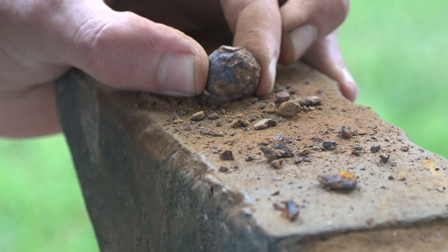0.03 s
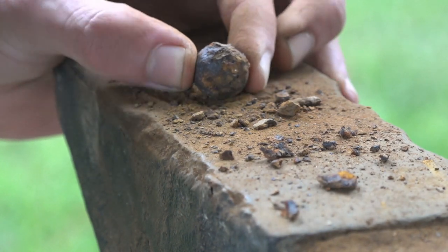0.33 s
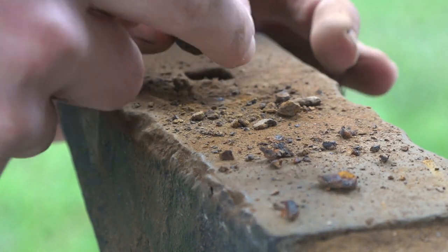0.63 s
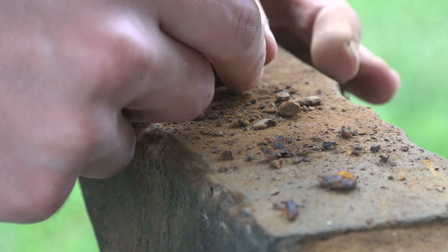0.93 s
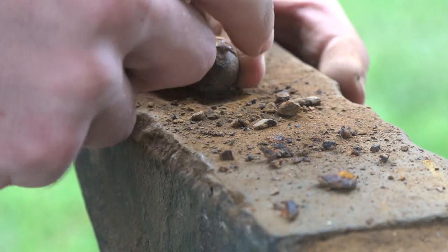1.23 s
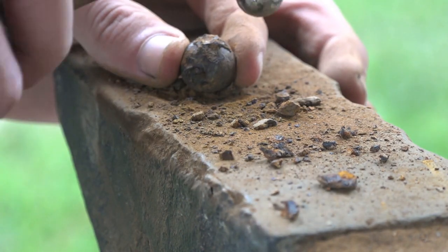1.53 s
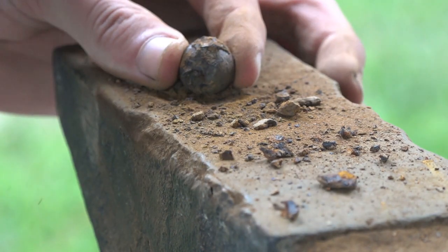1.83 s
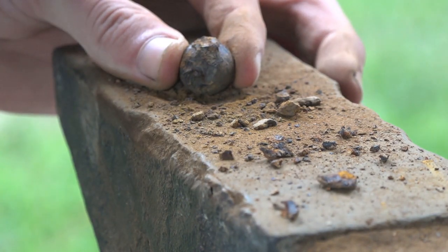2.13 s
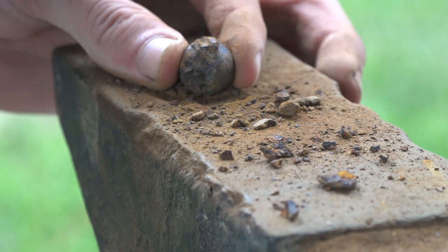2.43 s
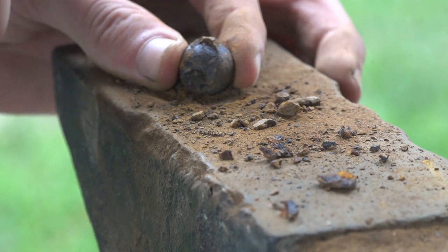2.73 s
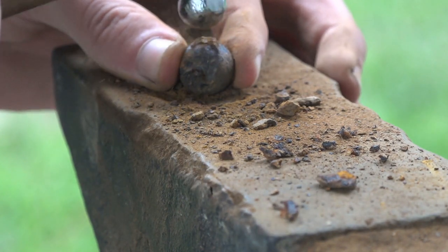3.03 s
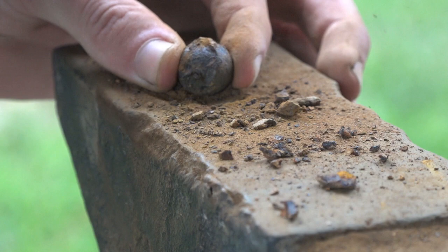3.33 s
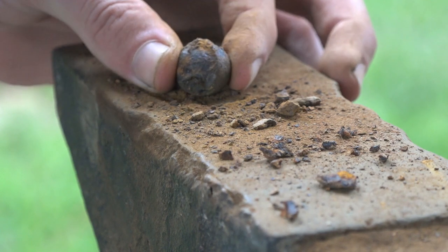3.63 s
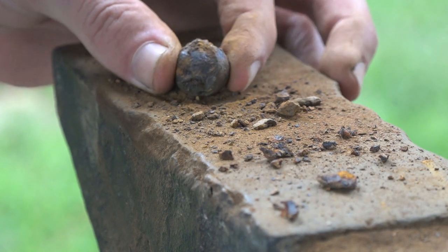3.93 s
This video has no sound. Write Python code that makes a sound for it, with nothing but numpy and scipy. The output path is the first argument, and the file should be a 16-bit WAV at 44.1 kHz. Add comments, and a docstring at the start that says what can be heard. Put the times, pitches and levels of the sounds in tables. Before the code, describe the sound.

A small hammer taps an iron ball on a heavy metal block, close by, at the very start and at 0.3 seconds. After a pause, nine more taps run from 1.8 to 3.9 seconds, about four a second, the last slightly softer. Each is a sharp crack with a dull knock, short clang, brief echo and thin lingering ring. Distant insects hiss faintly over a low rumble of outdoor air.

```python
"""A small hammer taps a rusty iron ball on a heavy iron block, outdoors, close to a stereo microphone:
two taps, a pause to turn the ball, then nine more. Each tap is a sharp crack, a knock of the block's
stand, a short clang and a long thin ring of the block. Nearby surfaces throw back a brief dense echo;
farther off, insects hiss over a faint rumble of air."""
import sys
import numpy as np
from scipy import signal
from scipy.fft import rfft, irfft, next_fast_len
from scipy.io import wavfile
from scipy.ndimage import map_coordinates

SR = 44100
rng = np.random.default_rng(int(sys.argv[2]) if len(sys.argv) > 2 else 0)


def output_pcm(signal):
    """Save a mono or channel-first signal as 16-bit PCM at the path in sys.argv[1].

    Samples are clipped to [-1, 1] before scaling.
    """
    pcm = np.clip(np.atleast_2d(signal).T, -1, 1) * 32767
    wavfile.write(sys.argv[1], SR, np.round(pcm).astype(np.int16))


N = 176400
TAP_SAMPLES = SR // 2  # room for one crack or echo


def amp(db):
    return 10 ** (np.asarray(db) / 20)


def along(points, hz):
    """(f/Hz, value) points read on a log axis."""
    f, v = np.transpose(points)
    return np.interp(np.log(hz + 1), np.log(f + 1), v)


def curve(rows):
    """(t/s, value) rows as one value per sample."""
    return np.interp(np.arange(N) / SR, *np.transpose(rows))


def wobble(knots_per_s):
    """A smooth random curve."""
    knots = rng.standard_normal(int(N * knots_per_s / SR) + 4)
    return map_coordinates(knots, [np.arange(N) * knots_per_s / SR])


def filtered(x, gain):
    """x times a gain that depends on frequency."""
    n = x.shape[-1]
    padded = next_fast_len(n + SR // 10)
    return irfft(rfft(x, padded) * gain(np.fft.rfftfreq(padded, 1 / SR)), padded)[..., :n]


def noise(spectrum, alike, size):
    """Stereo noise of rms 1 with a given spectrum and left-right likeness."""
    hz = np.fft.rfftfreq(size, 1 / SR)
    width = np.arccos(np.clip(along(alike, hz), -1, 1)) / 2
    bins = np.exp(2j * np.pi * rng.random((2, len(hz)))) * amp(along(spectrum, hz))
    mid, side = irfft(bins * [np.cos(width), np.sin(width)], size)
    return unit(np.array([mid + side, mid - side]))


def unit(x):
    return x / np.sqrt(np.mean(x ** 2) + 1e-20)


def fade(t, t60):
    """Exponential decay by 60 dB in t60."""
    return np.exp(-np.log(1000) * np.maximum(t, 0) / t60)


def add(out, x, start_s):
    """Mix x into out from start_s on."""
    i = round(start_s * SR)
    out[:, i:i + x.shape[1]] += x[:, :out.shape[1] - i]


# typical phase offset of a mode, opposite on the microphone's two sides: f/Hz, offset/rad
PHASE_SPREAD = [(200, 0.2), (500, 0.16), (1200, 0.027), (4500, 0.0075), (6000, 0.45), (9000, 0.81),
                (11000, .03)]
def ring(modes, levels_db, at_hz, build_s, scatter_db=2.24):
    """Struck modes, weighted by levels_db at at_hz, swell and die, out of step left and right."""
    t = np.arange(SR) / SR
    colour = list(zip(at_hz, levels_db))
    out = np.zeros((2, SR))
    for hz, db, t60 in modes:
        level, phase, spread = rng.standard_normal(3)
        offset = along(PHASE_SPREAD, hz) * spread * np.array([[1], [-1]])
        gain = amp(db + along(colour, hz) + scatter_db * level)
        out += gain * fade(t, t60) * np.sin(2 * np.pi * hz * t + np.pi * phase + offset)
    return out * (1 - np.exp(-t / build_s))


# spectrum of the open air: f/Hz, relative level/dB
AIR_SPECTRUM = [(25, -7), (65, 2.5), (120, 1), (230, 1), (320, -11.5), (450, -7), (650, -13), (1050, -9.5),
                (2500, -16.5), (5000, -17.5), (10000, -31), (13000, -24), (15500, -22.5)]
# the rumble dips after the taps and returns as the recorder's gain recovers: t/s, level/dB
AIR_LEVEL = [(0, -63), (.8, -65.5), (1.3, -63.5), (1.8, -61.5), (2.2, -60.5), (4, -64)]
# background at the microphone: f/Hz, left-right likeness
BACKGROUND_ALIKE = [(50, 0.13), (130, 0.98), (1000, 0.74), (4000, 1), (7000, 0.39), (13000, 0.94)]
def air(gust_db=1):
    """Air rumbles faintly around the microphone, wavering in small gusts."""
    level_db = curve(AIR_LEVEL) + gust_db * wobble(knots_per_s=5.98)
    return noise(AIR_SPECTRUM, BACKGROUND_ALIKE, N) * amp(level_db)


# spectrum of the chorus: f/Hz, relative level/dB
INSECT_SPECTRUM = [(3500, -49), (4300, -12), (4700, 0.5), (5300, -13.5), (6300, -3), (6850, 3.5),
                   (7500, 2.5), (8150, -2.5), (8600, -10), (11000, -18)]
# the hiss comes up in the pause as the recorder's gain recovers: t/s, level/dB
INSECT_LEVEL = [(0, -61.5), (.7, -61.5), (1.3, -59), (1.8, -59), (2.2, -60), (4, -63)]
def insects():
    """A far chorus of insects blends into one high hiss."""
    return noise(INSECT_SPECTRUM, BACKGROUND_ALIKE, N) * amp(curve(INSECT_LEVEL))


# long modes of the iron block: f/Hz, level/dB, t60/s
BLOCK_MODES = [(1372, -51, .75), (3774, -46, .85), (3910, -30, .42), (4408, -58, .8), (5236, -50, .75),
               (5318, -47, .44), (5705, -58, .8), (5865, -59, .8), (5938, -50, .75), (6844, -59, .7),
               (8467, -55, .65), (9218, -46, .42), (9269, -46, .6), (9278, -52, .5), (9980, -53, .5),
               (11996, -62, .65), (14575, -62, .55)]
def block_ring(levels_db=(0, 0, 0)):
    """The heavy block takes up the blow and rings on, thin and long."""
    return ring(BLOCK_MODES, levels_db, at_hz=(1400, 4140, 9000), build_s=0.033)


def lingering_ring(age_s=0.12, db=-4):
    """The block still rings from a tap age_s before the start."""
    out = np.zeros((2, N))
    add(out, amp(db) * block_ring()[:, round(age_s * SR):], 0)
    return out


# spectrum of the contact, close up: f/Hz, relative level/dB
CRACK_SPECTRUM = [(100, -62), (400, 0), (1150, 2), (1900, -9), (3200, 5), (5000, -14.5), (8500, 7),
                  (10500, -1), (15500, -3)]
# crack and echo at the microphone: f/Hz, left-right likeness
TAP_ALIKE = [(100, 1), (400, 0.92), (2000, 0.85), (4500, 1), (8300, 0.46), (11500, 0.92)]
def crack(colour, db=-20.5, spike_db=-1):
    """Steel meets iron: a burst of noise with a spike in its first instant."""
    t = np.arange(TAP_SAMPLES) / SR
    envelope = fade(t, t60=0.02) + amp(spike_db) * fade(t, t60=0.0024)
    return amp(db) * filtered(noise(CRACK_SPECTRUM, TAP_ALIKE, TAP_SAMPLES), colour) * envelope


# dull modes of the stand: f/Hz, level/dB, t60/s
STAND_MODES = [(208.4, -39.5, 0.23), (266.8, -37.5, 0.09), (329.8, -43, 0.19), (462.4, -31.5, 0.11),
               (487, -33, 0.14), (674, -36, 0.14), (1063, -39.5, 0.22), (1108.5, -23.5, 0.1),
               (1195, -45, 0.3), (1434, -38.5, 0.25)]
def stand_knock(levels_db):
    """The blow passes through the block and knocks the stand beneath."""
    return ring(STAND_MODES, levels_db, at_hz=(500, 1100), build_s=0.012)


# short modes of hammer and ball: f/Hz, level/dB, t60/s
CLANG_MODES = [(1992, -20, .21), (2306, -41, .33), (2335, -40, .3), (3045, -40, .24), (3085, -37, .24),
               (3198, -32, .27), (3632, -31, .13), (4629, -39, .12), (4694, -28, .16), (4789, -27, .22)]
def clang(levels_db):
    """Hammer and ball ring briefly after they meet."""
    return ring(CLANG_MODES, levels_db, at_hz=(2380, 3250, 4650), build_s=0.013)


# spectrum of the surroundings' echo: f/Hz, relative level/dB
ECHO_SPECTRUM = [(50, -16), (150, -14), (220, -4), (800, -6.5), (1150, 2.5), (1700, -2.5), (2500, -3),
                 (3300, 2), (4500, 0), (5600, -3.5), (9000, -6.5), (10500, -9.5), (12500, -4),
                 (15500, -20.5)]
# time before the near echo starts to die: f/Hz, t/s
NEAR_HOLD = [(300, 0.042), (2000, 0.025), (6000, 0.0043), (14000, 0.028)]
# its decay: f/Hz, t60/s
NEAR_DECAY = [(80, 0.43), (250, 0.069), (600, 0.12), (1300, 0.15), (3200, 0.19), (7000, 0.2), (14000, 0.16)]
def echo(shared, colour, fresh_share=0.16, near_db=-29.5, far_db=-64.5):
    """Dense reflections, almost alike each tap, hold and die band by band over a faint far echo."""
    fresh = noise(ECHO_SPECTRUM, TAP_ALIKE, TAP_SAMPLES)
    scatter = np.sqrt(1 - fresh_share) * shared + np.sqrt(fresh_share) * fresh
    hz, t, bands = signal.stft(filtered(scatter, colour), SR, nperseg=256)
    near = amp(near_db) * fade(t - along(NEAR_HOLD, hz)[:, None], along(NEAR_DECAY, hz)[:, None])
    far = amp(far_db) * fade(t, t60=0.85)
    return signal.istft(bands * (near + far), SR, nperseg=256)[1]


# reflections from walls a few metres off: t/s after the crack, level/dB
WALL_RETURNS = [(0.0106, -6.5), (0.0164, -8.5), (0.027, -22)]
# their tone: f/Hz, level/dB
WALL_TONE = [(3300, -6), (8000, -2), (12000, 7.5)]
def wall_reflections(out, contact, start_s):
    """Nearby walls throw distinct, brighter copies of the crack back to the microphone."""
    thrown_back = filtered(contact, lambda hz: amp(along(WALL_TONE, hz)))
    for delay_s, db in WALL_RETURNS:
        add(out, amp(db) * thrown_back, start_s + delay_s)


# hammer blows: t/s, then relative level/dB of the crack's knock, clack, snap and sizzle;
# echo; stand; low, middle and high clang; block ring and its top
BLOWS = [(0.0422, -1, 6.5, 0, -10.5, -0.5, -4, -4.5, 2, 0, -1.5, 3),
         (0.2886, 0, 7, 1.5, -1.5, 0.5, -3.5, 0.5, 4, 3, 7, 6),
         (1.845, 3, 2, 6, -17, -5, 0, -8, -22, -11, -15.5, 2.5),
         (2.093, 4, 4, 1.5, -4.5, -1, 2.5, 5, -2, 0.5, 2, 6.5),
         (2.3367, 1, 4.5, -4, -4, 2.5, 3, 2, 6, 4, 6, 6.5),
         (2.5915, -0.5, 2.5, -2, -1, 2, -4, 5, 1.5, -16, 3, 7.5),
         (2.8486, 1, 0, -2, -2.5, 0.5, -0.5, 0, -27, 1.5, -2, -1),
         (3.099, 2, 0, -1.5, -5.5, -1, -3.5, -2.5, -4, 0, -8, 1),
         (3.3491, -2, -7.5, -0.5, -8, 1.5, -7.5, 0, -3.5, -3.5, -13.5, 1.5),
         (3.5931, -6.5, -5.5, -3, -9, 2, -2, -6.5, -23, -1.5, -6, 2.5),
         (3.8518, -4, -2.5, -3.5, -3, -1, -19, -22.5, -11, 1.5, -1, 0.5)]
# lean of the taps at the microphone: f/Hz, left minus right level/dB
TAP_BALANCE = [(100, -1), (500, -2), (1200, -3.5), (2200, -3), (3400, 0), (4800, 0), (6000, -2), (9200, 3),
               (11000, 0)]
def hammer_taps(crack_hz=(1000, 3300, 8000, 13000)):
    """Every tap cracks, echoes and rings the metal; where it lands decides which modes speak."""
    out = np.zeros((2, N))
    shared_echo = noise(ECHO_SPECTRUM, TAP_ALIKE, TAP_SAMPLES)
    for start_s, knock, clack, snap, sizzle, echo_db, stand, low, middle, high, block, top in BLOWS:
        crack_levels = list(zip(crack_hz, (knock, clack, snap, sizzle)))
        colour = lambda hz: amp(along(crack_levels, hz))
        contact = crack(colour)
        add(out, contact, start_s)
        wall_reflections(out, contact, start_s)
        add(out, amp(echo_db) * echo(shared_echo, colour), start_s)
        add(out, stand_knock((knock, stand)), start_s)
        add(out, clang((low, middle, high)), start_s)
        add(out, block_ring((knock, block, top)), start_s)
    return filtered(out, lambda hz: amp(along(TAP_BALANCE, hz) * np.array([[.5], [-.5]])))


def scene():
    """Close taps and their ring over the outdoor background."""
    return hammer_taps() + lingering_ring() + air() + insects()


CEILING_DB, BAND_LIMIT_HZ = -8.5, 15800
def record(dry):
    """The recorder rounds off the highest peaks and keeps nothing above its band limit."""
    rounded = amp(CEILING_DB) * np.tanh(dry / amp(CEILING_DB))
    return filtered(rounded, lambda hz: hz < BAND_LIMIT_HZ)


dry = scene()
out = record(dry)
output_pcm(out)
```